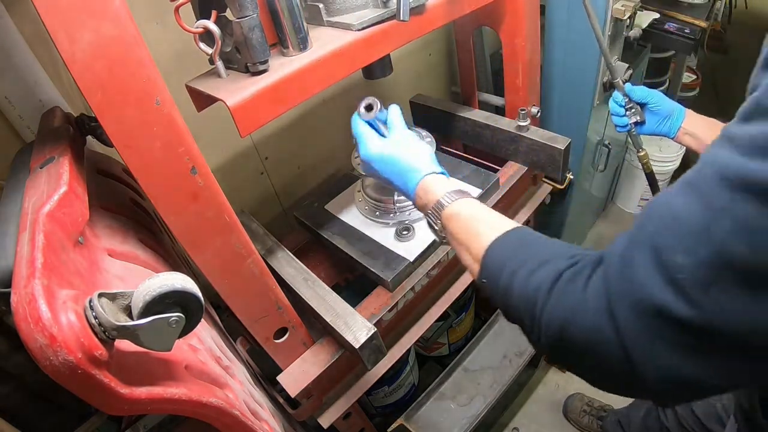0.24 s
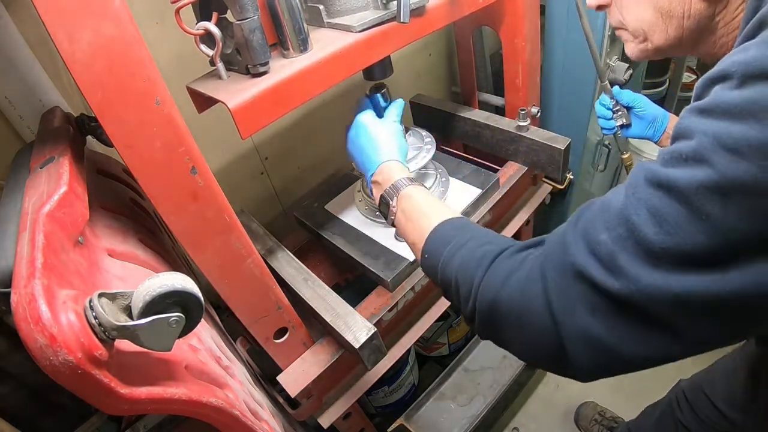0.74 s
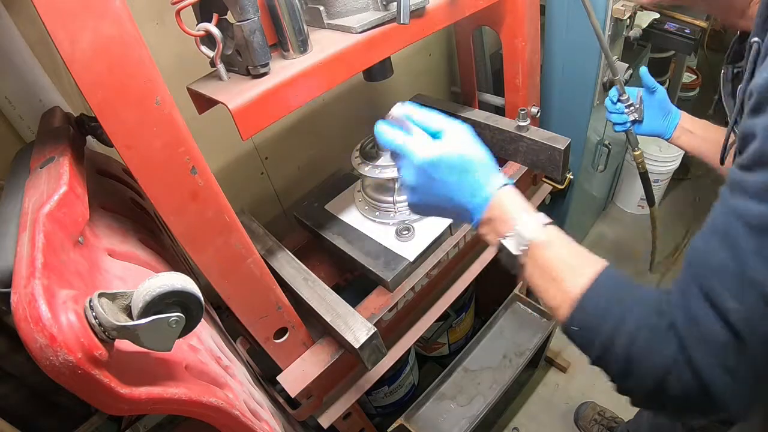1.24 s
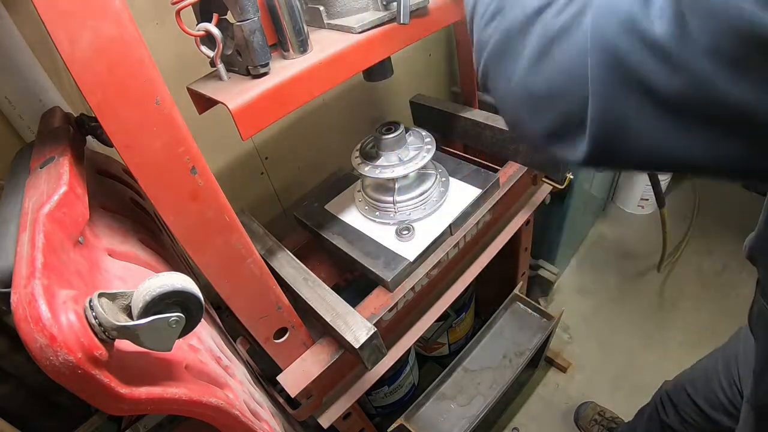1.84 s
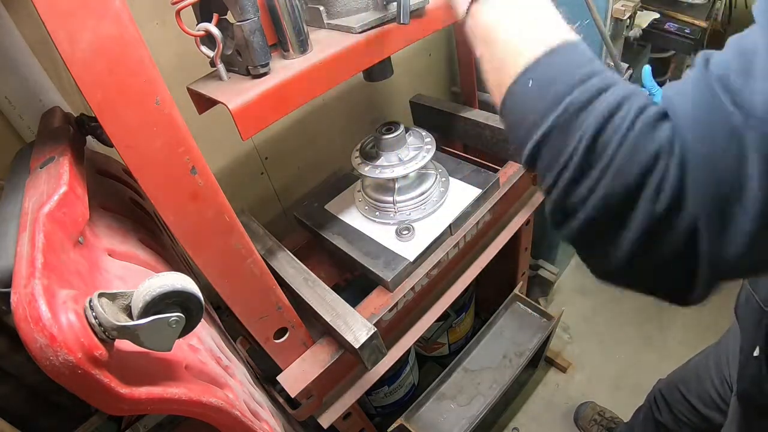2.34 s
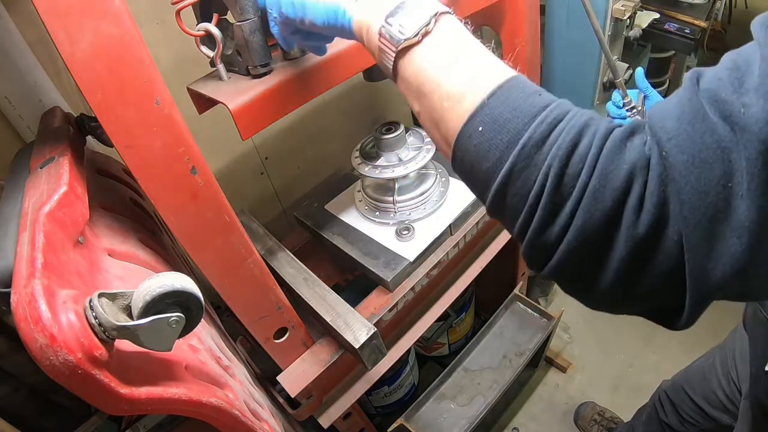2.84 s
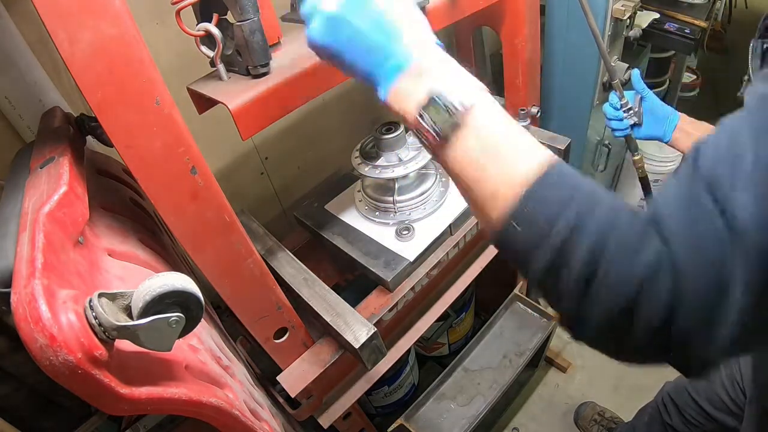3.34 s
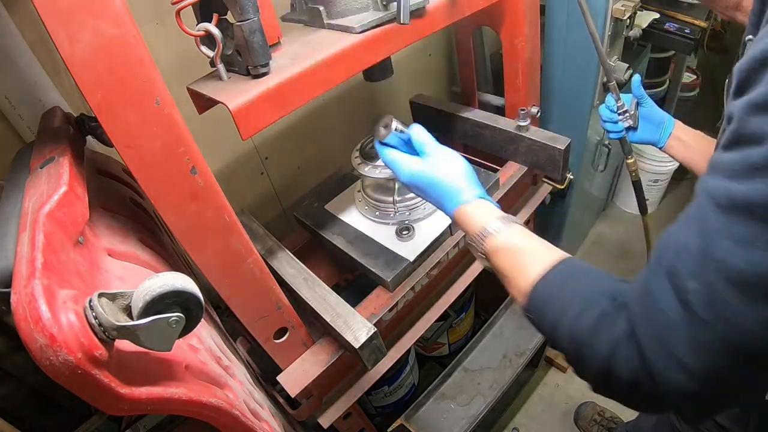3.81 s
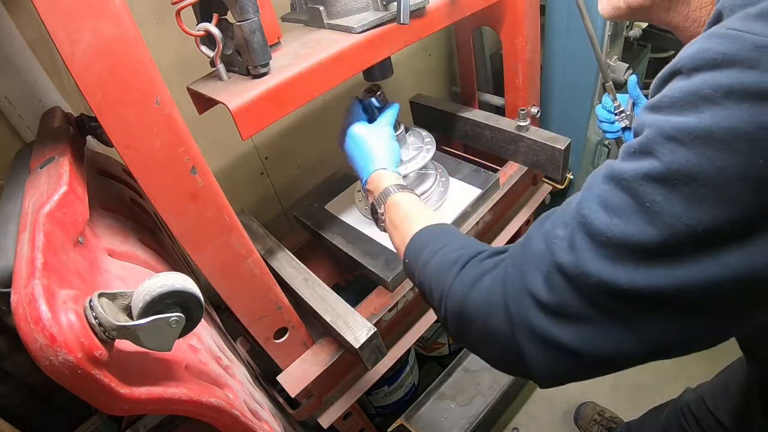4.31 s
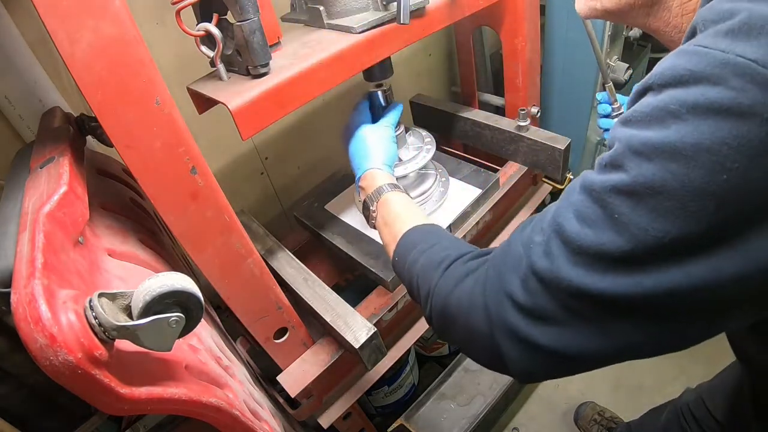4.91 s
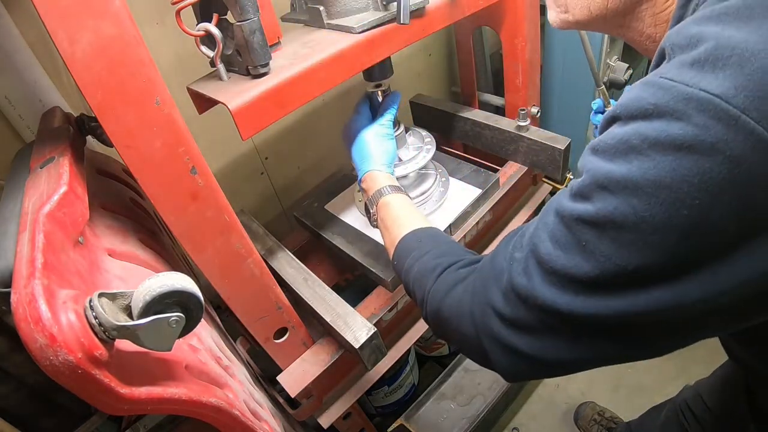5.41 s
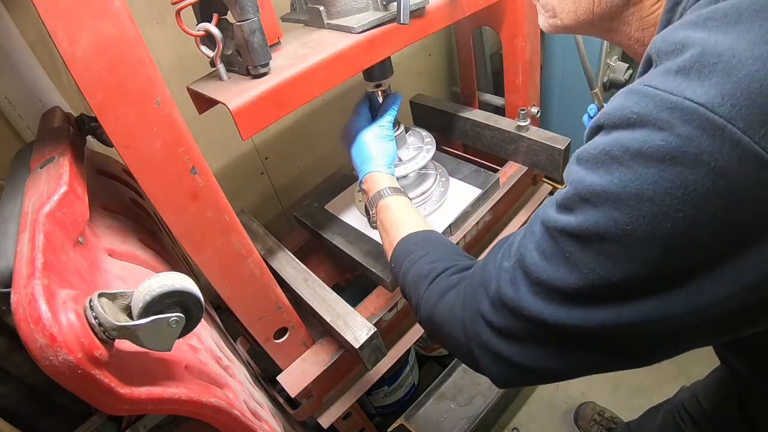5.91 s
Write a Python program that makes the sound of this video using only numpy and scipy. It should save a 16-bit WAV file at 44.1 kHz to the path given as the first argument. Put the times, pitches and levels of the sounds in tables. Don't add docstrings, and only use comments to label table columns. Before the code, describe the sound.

Fast pneumatic chugging and knocking cuts out, leaving a faint steel ring, followed by metal pieces set down with clacks, ticks and rustling.

```python
import sys
import numpy as np
from scipy import signal
from scipy.fft import rfft, irfft
from scipy.io import wavfile
from scipy.ndimage import uniform_filter1d

SR = 44100
rng = np.random.default_rng(int(sys.argv[2]) if len(sys.argv) > 2 else 0)


def transcribe(signal):
    frames = np.atleast_2d(signal).T
    limited = np.clip(frames, -1, 1)
    pcm = np.round(limited * 32767).astype(np.int16)
    wavfile.write(sys.argv[1], SR, pcm)


def nominal_scale(level):
    x = np.asarray(level, float) / 20
    return 10 ** x


N = 271656
T = np.arange(N) / SR
STEEL_HOLD_S = 1.53

# (time [s], peak level [dB], ring level [dB], contact [s], clatter t60 [s])
PARTS_SET_DOWN = [
    (1.9405, -4, 1, 0.018, 0.1),
    (2.905, -10, 1, 0.0068, 0.22),
    (4.054, -10, 1.5, 0.0085, 0.054),
    (4.231, -5, 3.5, 0.0032, 0.11),
    (4.5565, -13, 0, 0.0079, 0.037),
    (4.662, -29, 2.5, 0.037, 0.23),
]


def decay(t, t60_s):
    return np.exp(-np.log(1000) * np.maximum(t, 0) / t60_s)


def colour(x, points):
    hz, db = np.transpose(points)
    bins_hz = np.maximum(np.arange(len(x) // 2 + 1) * SR / len(x), 1)
    gain_db = np.interp(np.log(bins_hz), np.log(hz), db)
    return irfft(rfft(x) * nominal_scale(gain_db), len(x))


def noise(points, size=N):
    x = colour(rng.standard_normal(size), points)
    return x / x.std()


def band(hz, spread, size):
    points = [(hz / spread ** 2, -40), (hz / spread, -10), (hz, 0),
              (hz * spread, -12), (hz * spread ** 2, -50), (hz * spread ** 3, -90)]
    return noise(points, size)


def walk(rate_hz):
    hold = int(SR / rate_hz)
    x = np.repeat(rng.standard_normal(N // hold + 1), hold)
    x = uniform_filter1d(uniform_filter1d(x, hold), hold)[:N]
    return x / x.std()


def add(out, start_s, x):
    i = int(start_s * SR)
    x = x[max(-i, 0):N - i]
    out[max(i, 0):max(i, 0) + len(x)] += x


def swing(length_s):
    return np.gradient(np.hanning(int(length_s * SR) + 3))


def ring(modes, push, size):
    t = T[:size]
    x = sum(nominal_scale(db) * decay(t, t60_s) * np.sin(2 * np.pi * hz * t) for hz, db, t60_s in modes)
    x = signal.fftconvolve(x, push)[:size]
    return x / np.abs(x).max()


def strokes():
    # (frequency [Hz], level [dB], t60 [s])
    cylinder_modes = [(191, 0.5, 0.056), (235.6, -16, 0.32), (140, -7, .055), (332, -11, .03),
                      (357.2, -11.5, .3)]
    piston_modes = [(1060, 0, .011), (860, -23, .08), (587, -27, .12), (200, -13, .025), (400, -20, .03)]
    # (frequency [Hz], density [dB per Hz])
    exhaust_colour = [(250, -31), (420, -14.5), (600, -5), (1120, -6), (2000, -7.5), (2800, -7.5),
                      (5500, -5.5), (6600, -4.5), (9000, -9), (16000, -25)]
    # (thump level [dB], puff level [dB], knock level [dB], knock delay [ms])
    blows = [(-0.5, 0, 0, 0.082), (-1.5, 0.34, -0.7, 0), (-1.5, 1, 0.5, 0.041), (-1, -0.14, 0.7, 0),
             (0, 1.5, 1.2, 0), (-.5, -0.24, 0, 0), (0.5, 0.2, -0.5, 0), (0.5, 0.3, -1, 0),
             (0.5, 0, 1.4, 0.22), (0, -1.3, -1, .2), (0, -0.3, 0, 0), (0, -0.06, -0.46, 0),
             (0.5, 0.5, .3, 0), (-0.5, 0.1, -0.2, 0), (-1, 0.2, 2, -.3), (0, .3, -0.15, 0), (0, 0.05, 3, 0),
             (-4.5, 0, -60, 0)]
    first_s, stroke_s, slowing_s, last_late_s = -.0134, .06335, .000027, .0037
    vent_delay_s, knock_lag_s = .003, .028
    thump_mean_db, puff_mean_db, knock_mean_db, scatter_db = -11.32, -13.5, -7, .3

    out, gate, t = np.zeros(N), np.zeros(N), T[:4000]
    thump = ring(cylinder_modes, swing(.0042), size=8000)
    knock = ring(piston_modes, swing(.0012), size=4000)
    puff = np.clip(t / .0022, 0, 1) * decay(t - .008, .08)
    for k, (thump_db, puff_db, knock_db, late_ms) in enumerate(blows):
        last = k == len(blows) - 1
        start_s = first_s + k * (stroke_s + k * slowing_s) + last * last_late_s
        chance_db = scatter_db * rng.standard_normal()
        add(out, start_s + vent_delay_s, nominal_scale(thump_mean_db + thump_db) * thump)
        add(gate, start_s + vent_delay_s, nominal_scale(puff_mean_db + puff_db + chance_db) * puff)
        if not last:
            add(out, start_s + knock_lag_s + late_ms / 1000, -nominal_scale(knock_mean_db + knock_db) * knock)
    return out + gate * nominal_scale(1.9 * walk(400)) * noise(exhaust_colour)


def inlet():
    # (time [s], level [dB], lower whistle [Hz], whistle level [dB])
    valve_flow = [
        (0, -21, 3500, -20),
        (0.301, -22, 3630, -8),
        (.5, -22.5, 4000, 0.5),
        (0.902, -24.5, 4360, 3),
        (0.989, -27, 4410, 0),
        (1.04, -32, 4454, -8),
        (1.075, -36.5, 4400, -10),
        (1.15, -79, 4473, -8),
    ]
    # (frequency [Hz], density [dB per Hz])
    inlet_colour = [(150, -28.5), (420, -3.5), (662, -1.5), (1000, -4), (1260, -6), (1550, -2),
                    (3000, -8.5), (3900, -4.5), (5600, -7.5), (7200, -5.5), (16000, -30)]
    time_s, *columns = np.transpose(valve_flow)
    flow_db, whistle_hz, whistle_db = (np.interp(T, time_s, c) for c in columns)
    carrier = np.cos(2 * np.pi * np.cumsum(whistle_hz) / SR)
    gliding = noise([(1, 0.5), (300, -1.5), (1000, -20)]) * carrier
    fixed = noise([(5500, -30), (6300, -6), (6900, 0), (7600, -5), (8600, -25)])
    hiss = noise(inlet_colour) + nominal_scale(whistle_db) * (gliding + nominal_scale(-4) * fixed)
    return nominal_scale(flow_db + 1.6 * walk(150) + 1.1 * walk(45)) * hiss


def jolts():
    reach = (-0.5, 4.5, -4, -4, -8, -11)
    shake = np.zeros(N)
    for (start_s, db, *_), reach_db in zip(PARTS_SET_DOWN, reach):
        add(shake, start_s, nominal_scale(db + reach_db - 45.5) * decay(T, 1.75))
    return shake


def frame():
    # (frequency [Hz], level [dB], t60 [s])
    frame_modes = [(377, -16, 4), (461, -12, 3), (535, -13, 4), (610, -14, 3), (680, -15, 3),
                   (734, -10, 14), (750, -15, 5), (762, -2, 6), (774, -5, 6), (820, -9, 3), (845, -12, 4),
                   (892, -13, 9), (904, -5, 6), (919, -8, 10), (937, -7, 10)]
    out, jolt = np.zeros(N), nominal_scale(3) * jolts()
    for hz, db, t60_s in frame_modes:
        drive = nominal_scale(-47) * decay(T - STEEL_HOLD_S, t60_s) + jolt
        tone = np.sin(2 * np.pi * hz * T + rng.uniform(0, 2 * np.pi))
        out += nominal_scale(db + 1.3 * walk(4)) * drive * tone
    return out


def steel_hum():
    # (frequency [Hz], density [dB per Hz])
    hum_colour = [(300, -50.5), (500, -16), (700, 3.5), (760, 5), (860, 0.5), (940, 3), (1020, -11.5),
                  (1600, -16), (2600, -26.5), (5000, -100)]
    shake = nominal_scale(-54) * decay(T - STEEL_HOLD_S, 9) + jolts()
    return shake * nominal_scale(1.5 * walk(22) + 1.2 * walk(27)) * noise(hum_colour)


def still_air():
    # (frequency [Hz], density [dB per Hz])
    air_colour = [(18, -28.5), (30, 1), (382, -16.5), (496, -14.5), (680, -27.5), (755, -13), (1120, -26),
                  (1610, -28), (3540, -33), (10100, -36.5), (12500, -40.5), (15800, -38.5)]
    lamp_hz, lamp_db = 12050, -93
    return nominal_scale(-61) * noise(air_colour) + nominal_scale(lamp_db) * np.sin(2 * np.pi * lamp_hz * T)


def handling_rumble():
    # (time [s], level [dB])
    hands = [(1.2, -39.5), (1.25, -49), (1.81, -49), (1.86, -38.5), (1.95, -52), (3.2, -58), (3.27, -51),
             (3.34, -53.5), (3.55, -47), (3.67, -60.5), (4.07, -45.5), (4.61, -58), (5.44, -54),
             (5.47, -44.5), (5.54, -56), (6.16, -66.5)]
    # (frequency [Hz], density [dB per Hz])
    rumble_colour = [(15, -10.5), (35, -0.5), (80, -10.5), (160, -9), (300, -16.5), (600, -19.5),
                     (1500, -47), (4000, -100)]
    busy_db = np.interp(T, *np.transpose(hands))
    return nominal_scale(busy_db - 1 + 1.5 * walk(14)) * noise(rumble_colour)


def pings():
    # (time [s], level [dB], frequency [Hz], t60 [s], rise [s])
    single_modes = [(1.087, -22, 900, .07, .008), (1.09, -27, 1500, .05, .006), (1.18, -36, 821, .6, .03),
                    (1.42, -37, 820, .75, .09), (1.68, -52, 925, .45, .04), (3.434, -62, 7050, .12, .002),
                    (3.765, -62, 2080, .15, .01), (3.7, -65, 2550, .15, .01), (4.166, -41, 2210, .19, .0037),
                    (4.164, -38, 1570, .1, .003), (4.166, -48, 5050, .03, .002), (4.166, -43, 5990, .035, .002),
                    (4.7077, -46, 5050, .02, .001), (4.7077, -46, 7250, .025, .001),
                    (4.7345, -51, 7160, .022, .001), (4.7345, -47, 2000, .04, .002)]
    out, t = np.zeros(N), T[:50000]
    for start_s, db, hz, t60_s, rise_s in single_modes:
        swell = np.clip(t / rise_s, 0, 1) * decay(t, t60_s)
        add(out, start_s, nominal_scale(db) * swell * np.sin(2 * np.pi * hz * t))
    return out


def rustle():
    # (middle time [s], rms level [dB], frequency [Hz], length [s])
    rubs = [(1.298, -51, 1510, 0.19), (1.459, -66.5, 2580, 0.081), (1.518, -57.5, 1270, 0.13),
            (1.733, -67.5, 1460, 0.33), (1.867, -55, 2200, 0.035), (2.354, -57, 5500, 0.018),
            (2.547, -68, 8080, 0.036), (2.648, -66.5, 5950, 0.049), (3.091, -48, 1513, 0.028),
            (3.085, -58, 5760, 0.032), (3.133, -60.5, 4480, 0.045), (3.145, -51, 1270, 0.078),
            (3.178, -50, 845, 0.078), (2.072, -63.5, 8700, 0.079), (3.344, -72, 2900, 0.068),
            (3.448, -69.5, 6400, .1), (3.471, -68, 2270, 0.049), (3.674, -57, 2760, 0.025),
            (3.754, -67.5, 1490, 0.33), (3.351, -68.5, 1580, 0.17), (3.5, -75, 4020, 0.32),
            (3.693, -59.5, 5250, 0.059), (3.77, -69, 2070, 0.063), (3.947, -71, 2030, 0.14),
            (5.174, -62.5, 4470, 0.026), (5.15, -67.5, 2280, 0.023), (3.619, -66, 2600, 0.058),
            (3.88, -73, 2200, 0.074), (5.16, -59, 785, 0.042), (5.314, -68, 2400, 0.028),
            (5.32, -59.5, 800, .04), (5.4, -65, 900, .05), (5.474, -60, 700, 0.024),
            (5.46, -75, 1500, 0.065), (5.994, -77.5, 1500, 0.23)]
    out = np.zeros(N)
    for middle_s, db, hz, length_s in rubs:
        size = int(length_s * SR)
        rub = band(hz, 1.8, size=30000)[:2 * size]
        add(out, middle_s - length_s, nominal_scale(db) * np.hanning(2 * size) * rub)
    return nominal_scale(2.6 * walk(200) - 0.3) * out


def ticks():
    # (time [s], level [dB], frequency [Hz])
    contacts = [(1.3257, -33.5, 1860), (1.5773, -38, 1850), (1.639, -43.5, 1910), (1.69, -55.5, 1794),
                (1.726, -44.5, 1950), (1.7669, -46, 2300), (1.7725, -43.5, 2200), (1.781, -46.5, 2700),
                (1.7394, -45.5, 2400), (1.721, -46, 2000), (1.912, -50, 2500), (1.919, -51, 2000),
                (1.8091, -50, 2000), (1.827, -28, 2680), (1.8507, -41, 2166), (1.8604, -31.5, 2608),
                (1.8744, -40, 2400), (1.9058, -49.5, 2500), (2.2025, -37, 2380), (2.3503, -36, 2480),
                (2.3965, -46, 2400), (2.612, -50, 2190), (3.4337, -50, 7200), (3.4707, -44.5, 2010),
                (3.575, -50, 2420), (3.7575, -47, 2030), (3.956, -47.5, 2080), (4.7077, -41, 3500),
                (4.669, -53, 6300), (4.685, -55, 6000), (4.7335, -48, 6000), (5.384, -52, 1900),
                (5.052, -59.5, 1800), (3.7577, -50, 6200), (1.8385, -51, 6500), (1.8265, -38, 7000),
                (1.8744, -44.5, 7000), (1.8672, -56, 6500), (1.8847, -52, 4000), (3.526, -49, 1000),
                (1.8274, -31, 1300), (1.8485, -36, 1300), (3.079, -37, 3010), (3.096, -46, 1810),
                (3.128, -48, 4400), (4.9238, -38.5, 4420), (5.1404, -53.5, 2350), (5.1984, -41, 1840),
                (5.352, -45.5, 1500), (5.4642, -43.5, 1880), (5.64, -46, 1300)]
    out, t = np.zeros(N), T[:2000]
    for start_s, db, hz in contacts:
        spread = np.clip(6500 / hz, 1.3, 1.8)
        add(out, start_s, nominal_scale(db - 6) * band(hz, spread, size=2000) * decay(t, .011))
    return out


def thuds():
    # (time [s], level [dB], frequency [Hz])
    bumps = [(1.579, -37, 148), (1.762, -37, 85.4), (1.847, -28.5, 100), (1.873, -33, 79.8),
             (3.272, -38.5, 95), (3.526, -45, 108), (4.028, -36.5, 179), (5.198, -35.5, 124),
             (5.46, -37, 174), (5.467, -30.5, 47.5), (5.635, -41, 82.4)]
    t60_s = .071
    out = np.zeros(N)
    for start_s, db, hz in bumps:
        modes = [(hz, 0, t60_s), (2.8 * hz, -6, t60_s / 2),
                 (4.2 * hz, -10, t60_s / 4), (11 * hz, -16, t60_s / 8)]
        add(out, start_s, nominal_scale(db) * ring(modes, swing(.0017), size=6000))
    return out


def struck(modes, size):
    t, x = T[:size], np.zeros(size)
    for hz, db, t60_s in modes:
        phase, waver = rng.uniform(0, 2 * np.pi, 2)
        waver_db = 3.3 * np.sin(2 * np.pi * (9 + 3 * waver) * t + phase)
        x += nominal_scale(db + waver_db) * decay(t, t60_s) * np.sin(2 * np.pi * hz * t + phase)
    return x


def set_down():
    # (frequency [Hz], level [dB], t60 [s])
    shelf_modes = [(1157, -38, .3), (1215, -58, 2.3), (1371, -56, 2.2), (1402, -50, 2), (1507, -34, .3),
                   (1512, -52, 1.8), (1565, -29, .15), (1618, -54, 2), (1693, -53, 2), (1727, -56, 1.7),
                   (1906, -34, .3), (2231, -17, .27), (1000, -24, .07), (2290, -32, .12), (2357, -30, .2),
                   (1485, -35, .2), (2236, -44, .6), (2404, -48, 1.2), (2896, -24, .13), (3195, -28, .2),
                   (3763, -36, .08), (4570, -32, .1), (4883, -33, .1), (5362, -42, .25), (8400, -37, .08),
                   (5669, -36, .15), (6035, -32, .12), (6358, -42, .34), (6697, -49, .3), (7237, -43, .14)]
    socket_modes = [(1028, -25, .25), (1250, -38, .2), (1661, -36, .3), (2110, -41, .35), (2348, -29, .24),
                    (4596, -25, .19), (4596, -46, .5), (5021, -51, .6), (5693, -45, .2), (6024, -42, .22),
                    (6371, -37, .2), (3359, -50, .2), (4931, -47, .15), (1700, -30, .12), (4500, -33, .08),
                    (8425, -42, .07), (9593, -55, .18)]
    spacer_modes = [(585, -40, .3), (1572, -21, .1), (1590, -48, .8), (1346, -36, .09), (1949, -26, .55),
                    (1961, -44, .4), (2206, -27, .14), (2238, -36, .18), (2982, -35, .2), (3192, -48, .3),
                    (4175, -54, .3), (4583, -44, .24), (4992, -32, .13), (5136, -48, .3), (5857, -35, .08),
                    (6020, -37, .15), (6180, -40, .22), (6704, -55, .22)]
    hub_modes = [(311, -43, .45), (960, -36, .28), (1089, -30, .23), (1440, -33, .23), (1787, -46, .4),
                 (2404, -35, .45), (2440, -24, .09), (3449, -50, .4), (3915, -32, .18), (3870, -52, .45),
                 (4653, -41, .4), (4696, -41, .4), (4675, -18, .07), (5013, -62, .7), (6079, -44, .15),
                 (7079, -30, .09), (7125, -56, .7), (7099, -57, .8), (8724, -57, .22), (9041, -56, .13),
                 (12129, -54, .15), (13470, -69, .12), (15080, -69, .1), (10510, -40, .02)]
    ring_modes = [(1758, -41, .4), (1795, -42, .4), (2078, -32, .07), (2390, -46, .22), (3338, -39, .33),
                  (3445, -57, .4), (3871, -27, .06), (3860, -49, .3), (3905, -49, .3), (4700, -58, .25),
                  (7079, -41, .06), (7101, -54, .35), (7140, -57, .3), (8726, -50, .06), (5017, -47, .07),
                  (5518, -45, .054), (7741, -46, .04), (13510, -55, .054)]
    seat_modes = [(542, -53.5, 0.38), (700, -49.5, 0.35), (984, -47, 0.23), (1095, -44, 0.24),
                  (1386, -68, 0.13)]
    # (frequency [Hz], density [dB per Hz])
    clatters = [
        [(180, -49.5), (300, -28), (1530, -12), (1690, -22.5), (2170, -9.5), (2520, -17.5), (2880, -15), (5300, -26.5), (6100, -17), (7200, -35), (10500, -42), (16000, -62)],
        [(180, -60), (300, -16.5), (1030, 9.5), (1430, 0.5), (2320, 7.5), (3950, -13), (4750, -7), (5340, 1), (16000, -43)],
        [(180, -30), (300, -17), (1430, -16.5), (1580, -18), (1810, -17.5), (1970, -11), (2790, -21.5), (4300, -17), (5400, -21), (6000, -11.5), (7000, -34.5), (16000, -63)],
        [(150, -39.5), (350, 2.5), (1000, 6), (2200, 5), (3200, -9.5), (4700, -23), (6200, -22.5), (7400, -9), (9500, -24), (16000, -84)],
        [(250, 2), (500, -3.5), (2000, 9.5), (3000, -3), (4000, 6), (5500, -23), (7200, 1), (16000, -69)],
        [(150, -45), (250, 3.5), (1090, 3.5), (1600, -6.5), (2210, -4.5), (3920, -48), (6000, -35), (7800, -70), (13200, -120)],
    ]
    stilled = (2.9, 3.2, 4.229, 4.78, 4.71, 6)
    struck_modes = (shelf_modes, socket_modes, spacer_modes, hub_modes, ring_modes, seat_modes)

    out, rings, size = np.zeros(N), np.zeros(N), 50000
    t = T[:size]
    for hit, points, modes, held_s in zip(PARTS_SET_DOWN, clatters, struck_modes, stilled):
        start_s, db, ring_db, contact_s, t60_s = hit
        chatter = np.clip(t / .003, 0, 1) * decay(t - contact_s, t60_s)
        free = np.clip(t / .0015, 0, 1) * decay(t + start_s - held_s, .05)
        crack = band(11000, 2.5, size=4000) * decay(t[:4000], .014)
        add(rings, start_s, nominal_scale(ring_db) * free * struck(modes, size))
        add(out, start_s, nominal_scale(db - 45) * crack)
        add(out, start_s, nominal_scale(db - 15) * chatter * noise(points, size))
    return out, rings


def room(x):
    # (frequency [Hz], t60 [s], level [dB])
    room_bands = [(60.3, 0.33, -15.5), (267, 0.2, -2), (1020, .55, 3), (2830, 0.52, -1.5), (7050, .4, -8),
                  (14300, 0.25, -9)]
    size = 40000
    t, tail = T[:size], np.zeros(size)
    for hz, t60_s, db in room_bands:
        points = [(hz / 4, -40), (hz / 5.6, -6), (hz, 0), (hz * 1.8, -3), (hz * 4, -40)]
        tail += nominal_scale(db) * noise(points, size) * np.sqrt(hz / t60_s) * decay(t, t60_s)
    tail = tail * np.clip((t - .003) / .0035, 0, 1)
    return signal.fftconvolve(x, tail / np.sqrt(np.sum(tail ** 2)))[:N]


def channel_difference(mid):
    # (frequency [Hz], side against mid [dB])
    side_colour = [(60, -20), (150, -29), (300, -23), (1000, -28), (4000, -24), (15000, -12)]
    # (frequency [Hz], density [dB per Hz])
    hiss_colour = [(30, 0), (600, -14), (1500, -22.5), (4000, -16.5), (16000, -11.5)]
    side_kernel = colour(rng.standard_normal(1024) / 32, side_colour)
    side = signal.fftconvolve(mid, side_kernel)[300:N + 300]
    patches = uniform_filter1d(1. * (walk(40) > 1), size=400)
    return side * patches + nominal_scale(-80.5) * noise(hiss_colour)


def scene():
    air = strokes() + inlet()
    clatter, rings = set_down()
    metal = clatter + ticks() + thuds()
    rings = rings + pings()
    wet = room(nominal_scale(-14) * air + nominal_scale(-13.5) * metal + nominal_scale(-19.5) * rings)
    mid = air + metal + rings + wet + frame()
    mid = mid + steel_hum() + still_air() + handling_rumble() + rustle()
    side = channel_difference(mid)
    return np.array([mid + side, mid - side])


def roll_off(x):
    return signal.sosfilt(signal.butter(12, 16370, fs=SR, output="sos"), x)


def record(dry):
    top_cut = signal.ellip(8, .3, 75, 15850, fs=SR, output="sos")
    rounded = np.tanh(0.79 * dry) / 0.84
    return roll_off(signal.sosfilt(top_cut, rounded))


dry = scene()
out = record(dry)
transcribe(out)
```